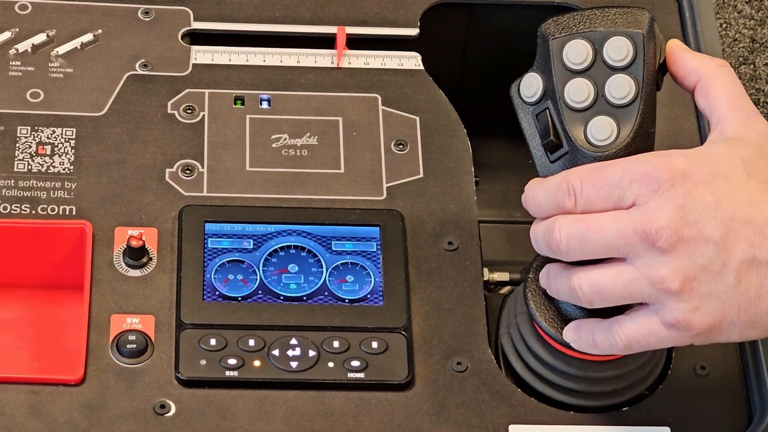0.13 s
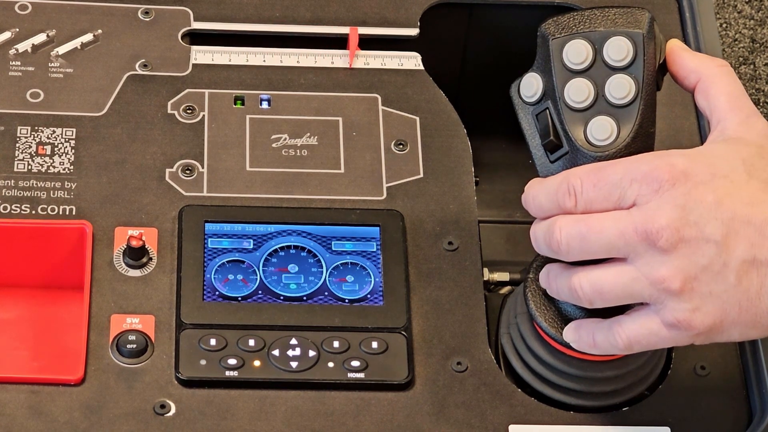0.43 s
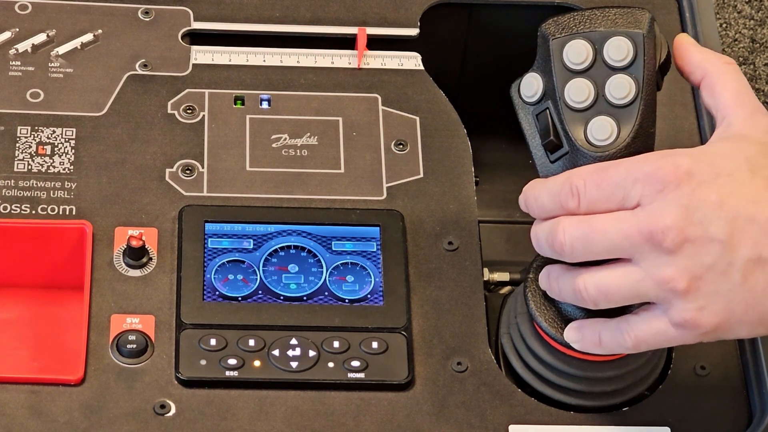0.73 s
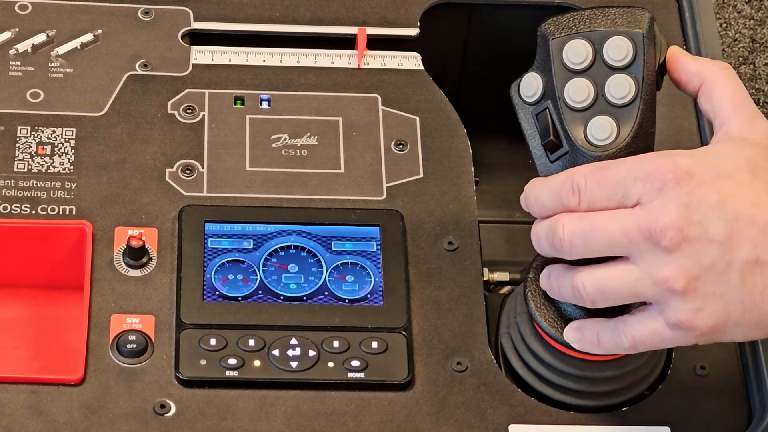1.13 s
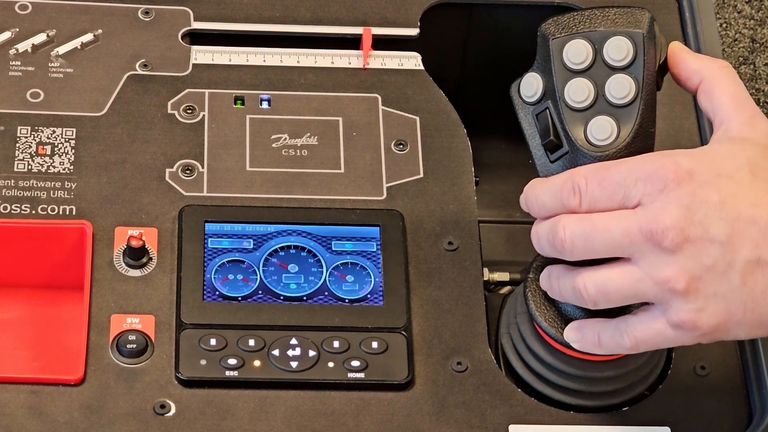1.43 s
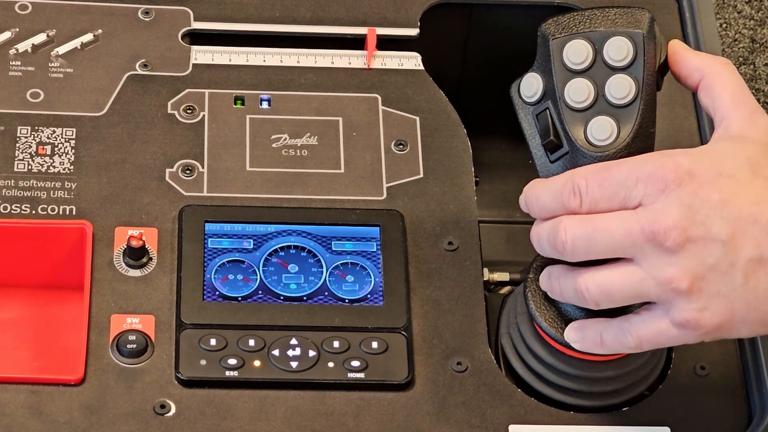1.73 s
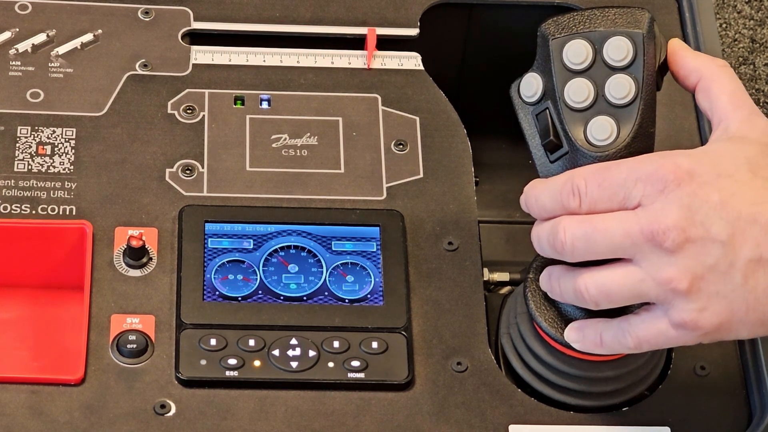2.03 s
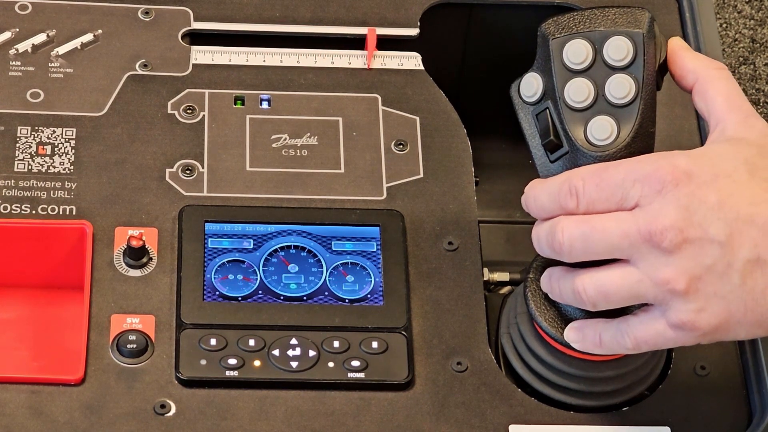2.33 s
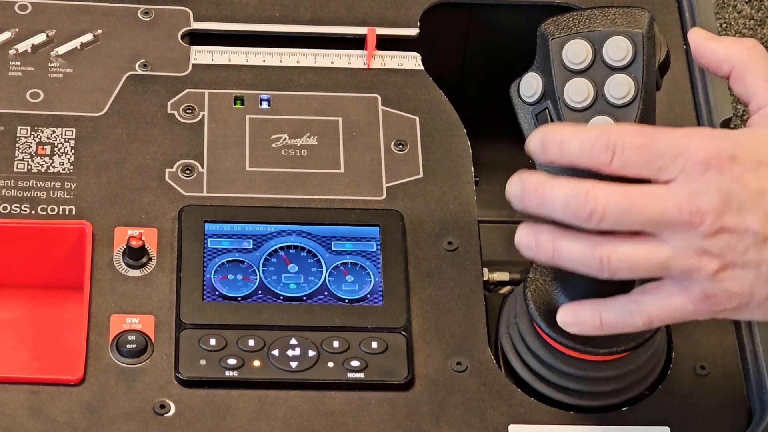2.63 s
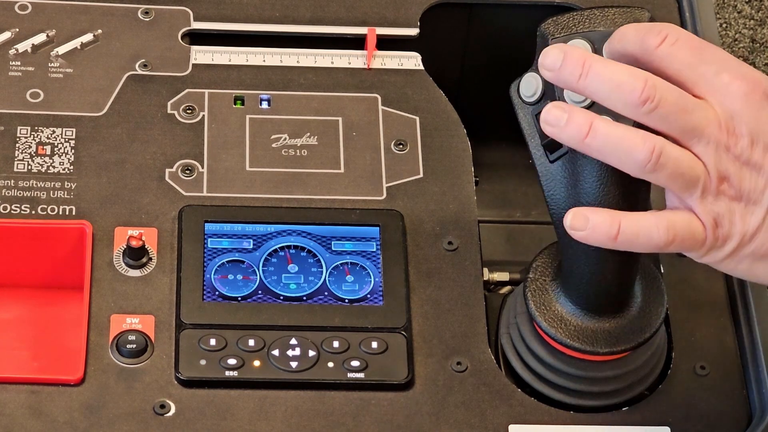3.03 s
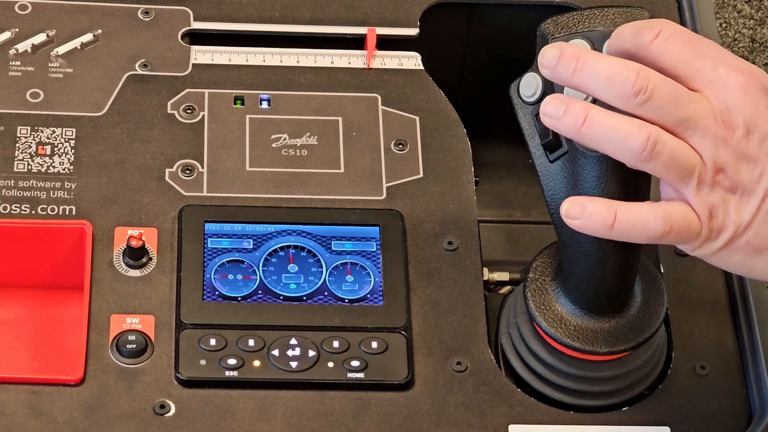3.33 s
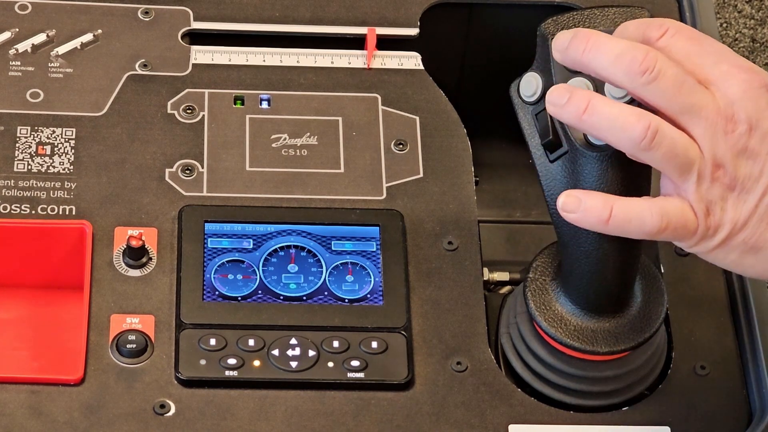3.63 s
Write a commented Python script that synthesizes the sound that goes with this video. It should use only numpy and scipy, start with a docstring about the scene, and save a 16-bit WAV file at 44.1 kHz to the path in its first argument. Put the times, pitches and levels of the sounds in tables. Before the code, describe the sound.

A small geared electric actuator whines steadily from the start, nasal and buzzy with gritty gear hiss. At 0.5 s a sharp double metallic clack cuts it; pitch falls away by 0.8 s. Faint ticks and soft plastic knocks follow around 0.8-1.2 s. A lower, weaker, uneven hum rises at 1.25 s, clacks at 1.5 s and dies by 1.8 s. Sparse handling knocks, busiest at 2.9-3.2 s, continue over quiet low room rumble until 3.6 s.

```python
"""In a quiet, rumbling room, a small geared electric actuator under a panel whines at full speed. A sharp clack
cuts it and it coasts down; it restarts slowly and hums in its housing, a second clack sounds while it runs, and
it then winds down. Faint ticks and the soft knocks of a hand on a plastic lever fall between the runs and after
them. The whine is a stack of sines locked to the shaft; rumble, hiss, knocks and room are filtered noise; the
clacks are noise bursts that ring metal modes, and the ticks are short decaying sines."""
import sys
import numpy as np
from scipy import signal
from scipy.io import wavfile

SR = 44100
rng = np.random.default_rng(int(sys.argv[2]) if len(sys.argv) > 2 else 0)


def materialize(psi):
    """Save the field psi as 16-bit PCM at rate SR to the path in sys.argv[1].

    A 1-D psi becomes a single channel; in a 2-D psi each row is a channel.
    """
    bounded = np.clip(np.atleast_2d(psi).T, -1, 1)
    quanta = np.round(bounded * 32767).astype(np.int16)
    wavfile.write(sys.argv[1], SR, quanta)


N = 167580

# Two motor runs, speed and loudness over time:
# (t/s, shaft speed/turns per s, whine level/dB, gear rumble level/dB, gear hiss level/dB)
MOTOR_RUNS = [
    [(0, 62.8, -45, -47, -56.5), (.25, 62.7, -43.5, -54, -59.5), (.5, 63.3, -43.5, -51.5, -55.5),
     (.555, 62.6, -47, -43.5, -58), (.615, 57.8, -51, -51, -60.5), (.665, 41.6, -59.5, -44, -66),
     (.705, 25.5, -69, -52, -81), (.74, 22.2, -67.5, -62, -84.5), (.8, 8.5, -96.5, -70, -100)],
    [(1.24, 8.7, -83, -68, -100), (1.3, 21, -75.5, -59, -85), (1.33, 26.5, -60.5, -54, -79.5),
     (1.38, 31.3, -58, -50, -77), (1.42, 38, -59.5, -52.5, -77), (1.48, 34.4, -66.5, -45.5, -58.5),
     (1.54, 40.4, -50, -50, -61), (1.61, 38.5, -59, -50, -79), (1.665, 30.2, -61, -50, -78.5),
     (1.715, 24, -71.5, -54.5, -92), (1.74, 23.4, -71, -69, -95), (1.8, 10.1, -89, -75.5, -100)],
]
# Harmonics of the shaft: (multiple of shaft speed, level/dB at full speed, on top of the whine level)
SHAFT_ORDERS = [(1, -30.5), (2, -25.5), (3, -20), (4, -22.5), (5, -13.5), (6, -22), (7, -14.5), (8, -19),
                (9, 3), (10, -12.5), (11, -30), (12, -21.5), (13, -35.5), (14, -32), (15, -17.5),
                (16, -32.5), (17, -31), (18, -32), (19, -24.5), (20, -38.5), (21, -33.5), (22, -38),
                (23, -32), (24, -43), (25, -32), (26, -44), (27, -23.5), (28, -29)]
# Resonances of the motor housing: (f/Hz, nominal width/Hz, level/dB)
HOUSING_RESONANCES = [(245.7, 33, -0.5), (265.6, 14, -2), (395.5, 15, -5), (499, 25, -3.5), (553, 32, -9.5),
                      (630, 38, -5.5), (764, 130, -15.5), (956, 18, -7.5), (1257, 140, -20)]
# Narrow resonances of the gear hiss: (f/Hz, nominal width/Hz, level/dB)
HISS_RESONANCES = [(1194, 11, -8), (1569, 20, -4.5), (1729, 69, -2.5), (2120, 110, -5.5), (2475, 240, -9.5),
                   (2998, 67, -13.5), (3420, 13, -17), (4090, 39, -13), (4353, 200, -17), (4654, 50, -10),
                   (4610, 62.5, -15.5), (5000, 21, -23.5), (5240, 55, -17), (5700, 161.1, -17),
                   (6200, 130, -23.5), (7480, 240, -26.5)]
# Wide hiss between them: (f/Hz, nominal width/Hz, level/dB)
WIDE_HISS = [(1439, 590, -19), (3700, 1300, -25), (6774, 860, -39), (11800, 780, -46.5)]
# Contacts of the cut-out:
# (t/s, nominal level/dB, rattle length/s, brightness/dB per octave around 4 kHz, favoured f/Hz)
CLACK_CONTACTS = [(0.5009, -22, 0.0043, 4, 8500), (0.511, -27.5, 0.0089, 1, 6360),
                  (.525, -41, 0.003, -3, 1580), (1.5002, -23.5, .0013, 1, 6400),
                  (1.504, -34, 0.0015, 0, 6400), (1.5105, -40, 0.002, -2, 4000),
                  (1.542, -72, 0.0021, -5, 6300)]
# Colour of the clack noise: (f/Hz, relative level/dB per Hz)
CLACK_SPECTRUM = [(410, -24), (700, 6.5), (1060, -6.5), (1820, -1.5), (2100, -10), (2240, -7), (3740, -5),
                  (4260, -8), (6320, -11), (7890, -19.5), (8650, -13.5), (12300, -19), (16000, -34.5)]
# Ringing metal modes: (f/Hz, relative level/dB, t60/s)
METAL_MODES = [(700, -5, 0.052), (900, -6.5, 0.0405), (1256, -8, 0.13), (1562, -6, 0.049),
               (1817, -3, 0.069), (2255, -7.5, 0.046), (3535, -6, .02), (4007, 1, 0.018),
               (5150, -6.5, 0.015), (6460, -4.5, .02), (7600, -5.5, 0.014), (8330, -1.5, 0.013),
               (9200, -16, 0.0094), (10400, -12.5, 0.0025), (12120, -5.5, 0.0074)]
# Dry ticks: (t/s, nominal level/dB, f/Hz)
TICK_EVENTS = [(0.814, -68, 5570), (.858, -73, 6390), (0.888, -69, 5860), (0.899, -65.5, 5070),
               (0.911, -62, 5570), (.921, -69.5, 6400), (1.158, -67.5, 6330), (1.1989, -51, 5400),
               (1.612, -69.5, 2460), (2.182, -67.5, 5300), (2.871, -69, 3940), (2.907, -69, 5440),
               (2.933, -72, 6400), (3.078, -78, 2680), (3.142, -70.5, 2450), (3.61, -73, 2274)]
# Knocks on the lever:
# (t/s, nominal level/dB, brightness/dB per octave around 1 kHz, length/s, f/Hz struck hardest)
LEVER_KNOCKS = [(0.9, -59, -1.5, 0.034, 930), (0.984, -68, 1.5, 0.067, 1530),
                (1.032, -59.5, -7, 0.042, 960), (2.02, -69, -5.5, 0.032, 1530),
                (2.179, -58.5, 2, 0.017, 3870), (2.199, -69, 4, 0.028, 5630),
                (2.204, -63.5, -8.5, 0.038, 900), (2.515, -60, -3, 0.066, 870),
                (2.869, -54, -3, 0.031, 3830), (2.901, -65.5, 1.5, 0.048, 5500),
                (2.927, -69.5, 5.5, 0.025, 4250), (2.955, -53.5, -4, 0.065, 5500),
                (3.05, -78, 6, 0.026, 3030), (3.075, -56.5, -3.5, 0.059, 2660),
                (3.133, -69, 1, 0.055, 2640), (3.158, -67.5, -11.5, 0.021, 880),
                (3.611, -68, -7, 0.022, 2660), (3.624, -79, -15, 0.043, 870)]
# Resonances of the plastic lever: (f/Hz, nominal width/Hz, level/dB)
LEVER_RESONANCES = [(296.5, 41.7, -3.5), (606.8, 300, -4), (874.2, 55, -5.5), (1072, 126, -4),
                    (1470, 350, -5.5), (2170, 560, -11), (2670, 120, -15), (3090, 140, -17),
                    (3520, 280, -14.5), (3910, 170, -19.5), (4270, 160, -19), (4030, 2100, -16),
                    (5520, 110, -23.5), (7200, 1500, -23), (12300, 1800, -31.5)]
# Colour of the room rumble: (f/Hz, relative level/dB per Hz)
ROOM_SPECTRUM = [(12, -36), (20, -7.5), (54, -9.5), (92, -0.5), (149, -9), (166, -12.5), (268, -17),
                 (307, -18), (390, -20.5), (423, -30), (471, -25.5), (599, -35.5), (722, -31.5),
                 (944, -40.5), (1020, -37), (4230, -48.5), (12000, -76.5), (15600, -104), (22000, -120)]
# How alike left and right noise are: (f/Hz, likeness 0-1)
STEREO_LIKENESS = [(30, .85), (100, 0.93), (300, 0.91), (1000, 0.2), (4000, 0.19), (12000, 0.091)]

FULL_SPEED = 62.9   # turns per s
# Waver of the tone: weak orders move more than those above -3 dB
WEAK_WAVER_DB, STRONG_WAVER_DB, WAVER_HZ = 4.25, .75, 12
SPEED_WAVER, SPEED_WAVER_HZ = .002, 11   # fraction of speed
# Slowness is 0 at full speed, 1 at rest, capped at .6; the two wavers grow with its square root
SLOW_WAVER_DB, SLOW_SPEED_WAVER, SLOW_SPEED_WAVER_HZ = 4, .035, 30
SLOW_DULL_DB = 8   # treble loss of the rumble, per octave and unit of slowness
HOUSING_FLOOR_DB = -22   # between and above the resonances
HISS_PULSING, HISS_PATCHY_DB, HISS_PATCHY_HZ = .25, 2.5, 5.9
# The big gear's turn in shaft turns, its starting point in turns, its grind and the spread between turns
GEAR_RATIO, GEAR_PHASE, GRIND_DB, GRIND_SPREAD = 4.4, .36, 9, .25
MOTOR_LEFT_DB, MOTOR_LAG_S = 1.7, -.00023   # a negative lag puts the left side first

SETTLE_DB, SETTLE_T60_S = -9, .06   # each rattle settles
TAIL_DB, TAIL_T60_S, TAIL_TREBLE_T60_S = -27, 0.46, 0.3   # decay in the room, at 1 kHz and 12 kHz
MODES_DB, CLACK_RING_DB = -36.5, 8.5   # all modes; extra drive near each contact's favoured pitch
THUMP_HZ, THUMP_DRIVE_DB, THUMP_T60_S, THUMP_LAG_S = 178, -12.5, 0.07, .022
CLACK_LEFT_DB = -.2

TICK_CYCLES, TICK_WIDE_DB = 33, -7   # cycles to fall 60 dB; the lower body of the snap
KNOCK_ATTACK_S = .004   # time constant at 1 kHz; the treble starts sooner
KNOCK_RING_DB, KNOCK_CHANCE_DB = 7, 2.5   # boost at the favoured pitch; spread of each strike
ROOM_DB, ROOM_PATCHY_DB, ROOM_PATCHY_HZ, ROOM_LEFT_DB = -55.5, 1.5, 3.2, .4


def amp(db):
    """Decibels to a linear gain."""
    return 10 ** (np.asarray(db) / 20)


def rms_one(x):
    """Bring the overall RMS to 1."""
    return x / np.sqrt(np.mean(x ** 2) + 1e-20)


def at_hz(points, hz):
    """Read a curve along log frequency."""
    f, value = np.array(points).T
    return np.interp(np.log(hz), np.log(f), value)


def near(hz, favoured_hz):
    """1 at the favoured pitch, nearly 0 a quarter of an octave away."""
    return np.exp(-(np.log2(hz / favoured_hz) / .12) ** 2)


def drift(rate_hz):
    """Slow random curve of RMS 1: low-passed noise drawn every 40 samples and joined by lines."""
    r = np.exp(-80 * np.pi * rate_hz / SR)
    noise = rng.standard_normal(N // 40 + 2002)
    slow = signal.lfilter([1], [1, -2 * r, r * r], noise)[2000:]   # skip the filter's start
    return np.interp(np.arange(N) / 40, np.arange(len(slow)), rms_one(slow))


def peak(x, hz, width):
    """One resonance, gain 1 on top."""
    r = np.exp(-np.pi * width / SR)
    poles = [1, -2 * r * np.cos(2 * np.pi * hz / SR), r * r]
    return signal.lfilter(np.array([1, 0, -1]) * (1 - r * r) / 2, poles, x + 1e-18)


def double_peak(x, hz, width):
    """The same resonance twice, for steeper skirts."""
    return peak(peak(x, hz, width), hz, width)


def ring(clicks, hz, t60):
    """A unit click sets a decaying sine of height 1 ringing."""
    r, w = amp(-60 / (t60 * SR)), 2 * np.pi * hz / SR
    return signal.lfilter([0, np.sin(w)], [1, -2 * r * np.cos(w), r * r], clicks + 1e-18)


def pair(hz):
    """Two white noises, as alike as left and right are at this pitch."""
    mid, side = rng.standard_normal((2, N))
    alike = np.clip(at_hz(STEREO_LIKENESS, hz), 0, 1)
    return np.sqrt((1 + alike) / 2) * mid + np.sqrt((1 - alike) / 2) * side * [[1], [-1]]


def bands(spectrum, gain):
    """Half-octave bands of stereo noise; gain(hz) is each band's course in time."""
    out, edges = 0, 20 * 2 ** np.arange(0, 10.1, .5)
    for low, high in zip(edges, edges[1:]):
        hz = np.sqrt(low * high)
        if hz > spectrum[0][0]:
            sos = signal.butter(2, [low, min(high, .45 * SR)], "band", fs=SR, output="sos")
            out = out + amp(at_hz(spectrum, hz)) * gain(hz) * signal.sosfilt(sos, pair(hz))
    return out


def dying(times, db, t60):
    """Envelope that jumps up at each time and dies away."""
    out = np.zeros(N)
    for start, level_db, length in np.broadcast(times, db, t60):
        i = int(start * SR)
        n = np.arange(min(int(2 * length * SR), N - i))
        out[i:i + len(n)] += amp(level_db - 60 * n / SR / length)
    return out


def placed(x, left_db, lag_s=0):
    """Pan by raising the left and lowering the right, and by a lag of the left side."""
    n = np.arange(N)
    left = np.interp(n - lag_s * SR, n, x[0])
    return np.array([amp(left_db) * left, amp(-left_db) * x[-1]])


def motor():
    """One shaft speed drives a tonal whine, a gear rumble and a gear hiss."""
    t, *columns = np.transpose(MOTOR_RUNS[0] + MOTOR_RUNS[1])
    speed, whine_db, rumble_db, hiss_db = [np.interp(np.arange(N) / SR, t, c) for c in columns]
    slow = np.clip(1 - speed / FULL_SPEED, 0, .6)
    shake = SLOW_SPEED_WAVER * np.sqrt(slow) * drift(SLOW_SPEED_WAVER_HZ)
    turns = np.cumsum(speed * (1 + SPEED_WAVER * drift(SPEED_WAVER_HZ) + shake)) / SR
    whine = np.sqrt(2) * amp(whine_db) * shaft_whine(speed, turns, slow)
    return (placed(whine[None], MOTOR_LEFT_DB, MOTOR_LAG_S)
            + amp(rumble_db) * gear_rumble(slow) + amp(hiss_db) * gear_hiss(turns))


def shaft_whine(speed, turns, slow):
    """Sines at multiples of the shaft speed swell and fade as they sweep the housing resonances."""
    f = np.arange(2500.)
    power = sum(amp(db) ** 2 / (1 + ((f - hz) / width) ** 2) ** 2 for hz, width, db in HOUSING_RESONANCES)
    response = np.sqrt(amp(HOUSING_FLOOR_DB) ** 2 + power)
    whine = 0
    for order, db in SHAFT_ORDERS:
        waver_db = (WEAK_WAVER_DB if db < -3 else STRONG_WAVER_DB) + SLOW_WAVER_DB * np.sqrt(slow)
        # relative to full speed, where the order levels hold
        housing = np.interp(order * speed, f, response) / np.interp(order * FULL_SPEED, f, response)
        tone = np.sin(2 * np.pi * (order * turns + rng.random()))
        whine = whine + amp(db + waver_db * drift(WAVER_HZ)) * housing * tone
    return whine


def gear_rumble(slow):
    """Noise rings the housing resonances and dulls as the speed falls."""
    rumble = 0
    for hz, width, db in HOUSING_RESONANCES:
        level_db = db - SLOW_DULL_DB * slow * np.log2(hz / 250)
        rumble = rumble + amp(level_db) * double_peak(pair(hz), hz, 1.7 * width)
    return rms_one(rumble)


def gear_hiss(turns):
    """Resonant noise pulses with each shaft turn; its treble jumps up and sinks once per big-gear turn."""
    gear = turns / GEAR_RATIO + GEAR_PHASE
    strength = 1 + GRIND_SPREAD * rng.standard_normal(40)[gear.astype(int) % 40]   # differs each turn
    grind = (.5 - gear % 1) * strength
    hiss = 0
    for hz, width, db in HISS_RESONANCES + WIDE_HISS:
        level_db = db + HISS_PATCHY_DB * drift(HISS_PATCHY_HZ) + GRIND_DB * grind * (3800 < hz < 7000)
        hiss = hiss + amp(level_db) * double_peak(pair(hz), hz, 1.6 * width)
    return rms_one(hiss) * (1 + HISS_PULSING * np.sin(2 * np.pi * turns))


def clacks():
    """Each contact is a short rattle that rings metal modes, thumps the panel and dies away in the room."""
    t, db, length, bright_db, favoured_hz = np.transpose(CLACK_CONTACTS)

    def course(hz, ring_db=0):
        """Rattle, settling and room tail of every contact at one pitch."""
        level_db = db + bright_db * np.log2(hz / 4000) + ring_db * near(hz, favoured_hz)
        rattle = dying(t + length, level_db + SETTLE_DB, SETTLE_T60_S)
        for start, gain, hold in zip(t, amp(level_db), length):
            i, j = int(start * SR), int((start + hold) * SR)
            rattle[i:j] += gain * np.linspace(.7, 1.1, j - i)
        tail_t60 = np.interp(np.log(hz), np.log([1000, 12000]), [TAIL_T60_S, TAIL_TREBLE_T60_S])
        return rattle + dying(t, level_db + TAIL_DB, tail_t60)

    gains = amp(at_hz(CLACK_SPECTRUM, np.linspace(700, 16000, 50)))
    noise = bands(CLACK_SPECTRUM, course) / np.sqrt(np.mean(gains ** 2)) / 2
    grit = rng.standard_normal(N) * amp(2.64 * rng.exponential(1, N) - 7.5)   # uneven touches
    modes = sum(amp(level_db) * ring(course(hz, CLACK_RING_DB) * grit, hz, t60)
                for hz, level_db, t60 in METAL_MODES)
    push = np.zeros(N)
    push[((t + THUMP_LAG_S) * SR).astype(int)] = amp(db + THUMP_DRIVE_DB)
    thump = ring(peak(push, THUMP_HZ, 60), THUMP_HZ, THUMP_T60_S)
    return placed(noise + amp(MODES_DB) * modes + thump, CLACK_LEFT_DB)


def ticks():
    """Tiny dry snaps: two close sines ring a few cycles over a lower, wider body."""
    out = np.zeros(N + 2000)
    for t, db, hz in TICK_EVENTS:
        click = np.zeros(2000)
        click[0] = amp(db)
        snap = ring(click, hz, TICK_CYCLES / hz) + ring(click, 1.106 * hz, TICK_CYCLES / hz)
        body = ring(click, 0.514 * hz, 0.0045) + ring(click, 0.33 * hz, 0.0064)
        i = int(t * SR)
        out[i:i + 2000] += double_peak(snap, hz, 2000) + amp(TICK_WIDE_DB) * peak(body, .5 * hz, 2400)
    return out[:N]


def knocks():
    """Short puffs of friction noise excite the lever's resonances, each with a strength of its own."""
    t, db, bright_db, length, favoured_hz = np.transpose(LEVER_KNOCKS)
    chance_db = rng.normal(0, KNOCK_CHANCE_DB, (len(t), len(LEVER_RESONANCES)))
    grain = amp(2.0 * rng.exponential(1, N // 40 + 1)).repeat(40)[:N]   # uneven friction
    out = 0
    for k, (hz, width, level_db) in enumerate(LEVER_RESONANCES):
        favoured_db = KNOCK_RING_DB * near(hz, favoured_hz) * (width < 400)   # narrow resonances only
        strike_db = db + bright_db * np.log2(hz / 1000) + chance_db[:, k] + favoured_db
        step = hz / (1000 * KNOCK_ATTACK_S * SR)
        puff = signal.lfilter([step], [1, step - 1], dying(t, strike_db, 5.9 * length))   # soft onset
        rung = peak(peak(pair(hz) * grain * puff, hz, width), hz, 2 * width)
        out = out + amp(level_db) * np.sqrt(SR / width / 20) * rung   # narrow filters pass less noise
    return out


def room():
    """Low steady rumble: shaped noise whose bands drift gently in level."""
    noise = rms_one(bands(ROOM_SPECTRUM, lambda hz: amp(ROOM_PATCHY_DB * drift(ROOM_PATCHY_HZ))))
    return placed(amp(ROOM_DB) * noise, ROOM_LEFT_DB)


def scene():
    """All layers, from the motor to the room."""
    return motor() + clacks() + ticks() + knocks() + room()


def record(dry):
    """A steep low-pass takes everything above 16.3 kHz down by at least 60 dB."""
    return signal.sosfilt(signal.cheby2(14, 60, 16300, fs=SR, output="sos"), dry)


dry = scene()
out = record(dry)
materialize(out)
```